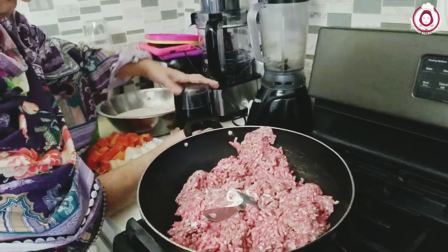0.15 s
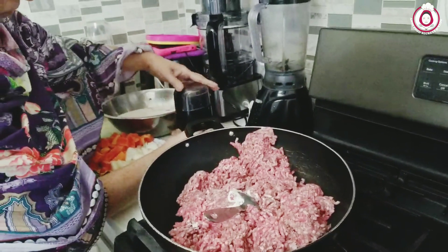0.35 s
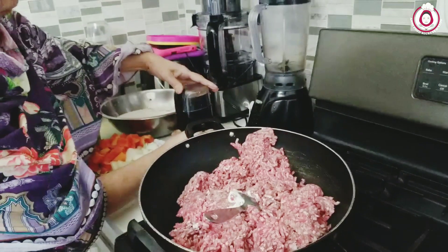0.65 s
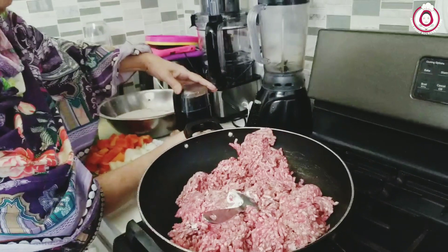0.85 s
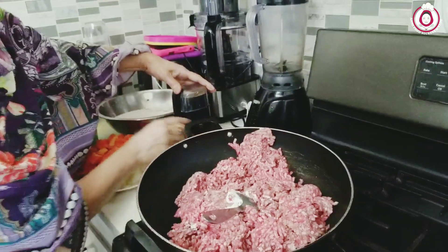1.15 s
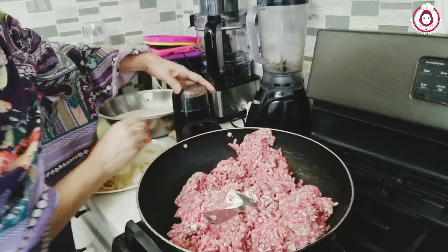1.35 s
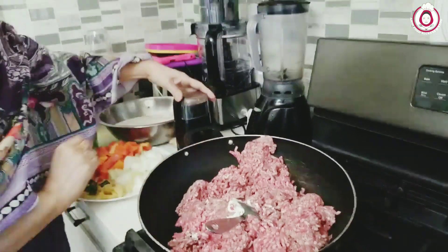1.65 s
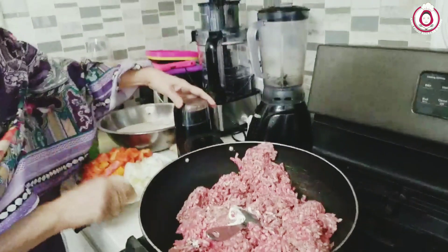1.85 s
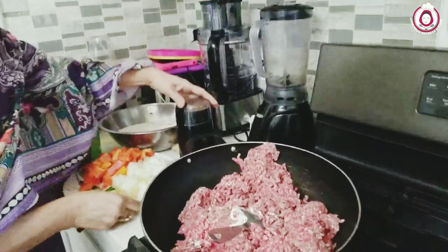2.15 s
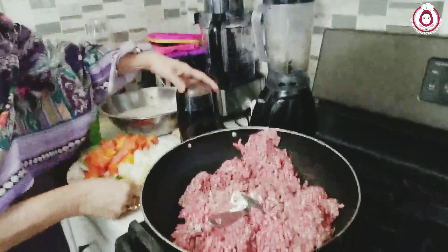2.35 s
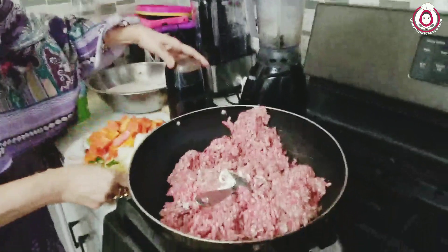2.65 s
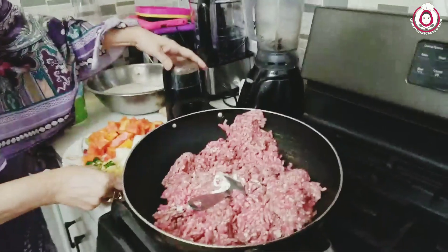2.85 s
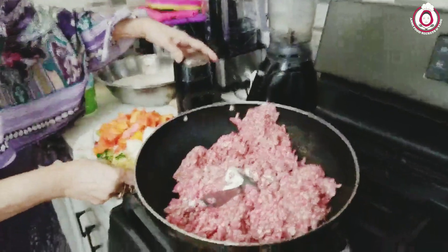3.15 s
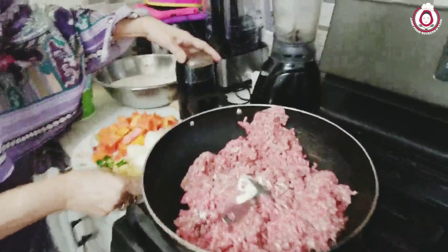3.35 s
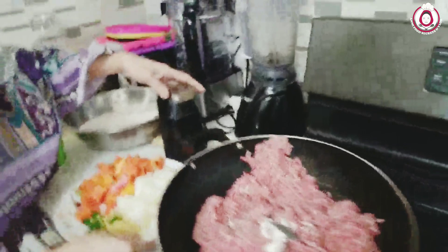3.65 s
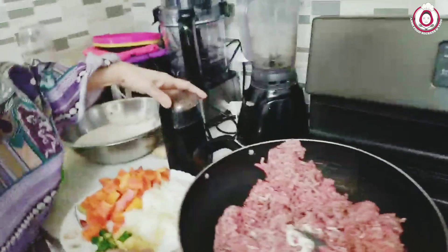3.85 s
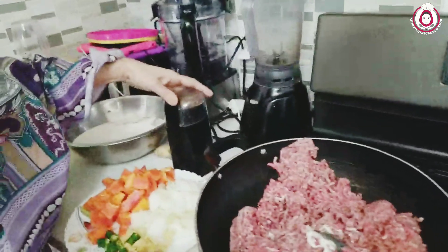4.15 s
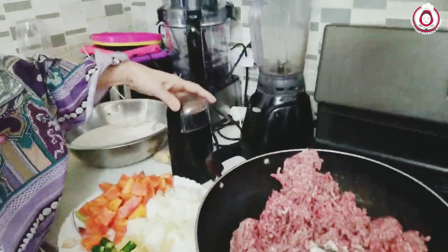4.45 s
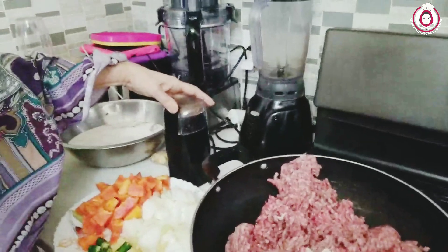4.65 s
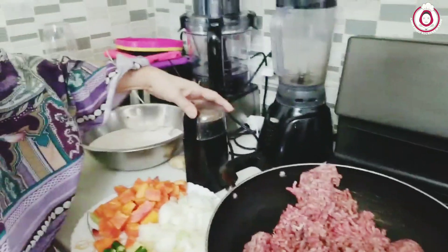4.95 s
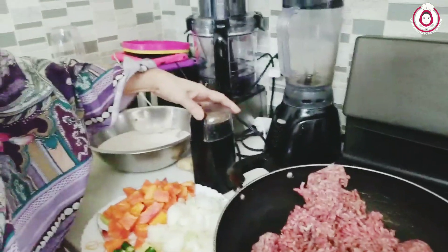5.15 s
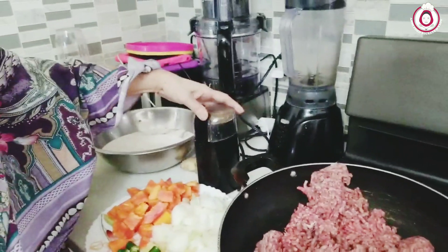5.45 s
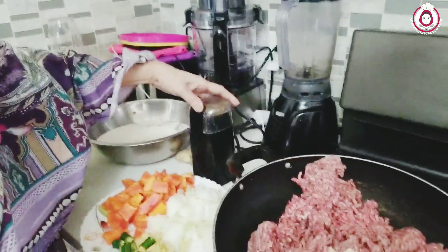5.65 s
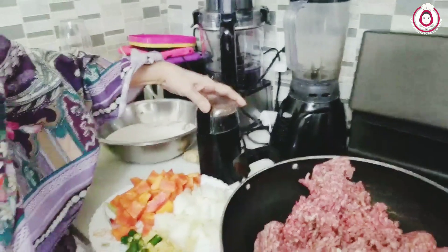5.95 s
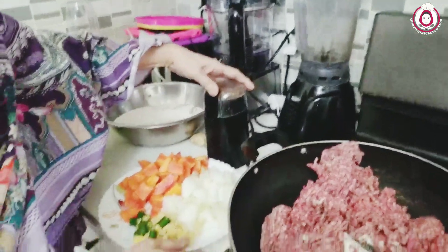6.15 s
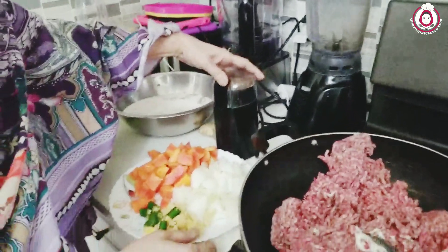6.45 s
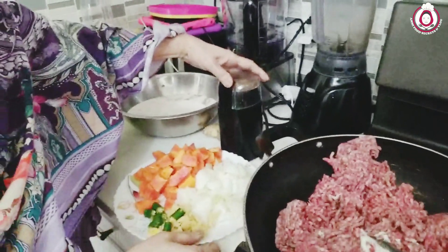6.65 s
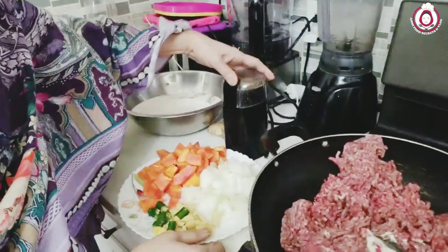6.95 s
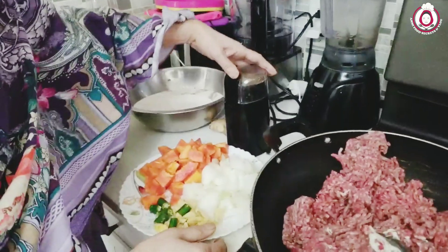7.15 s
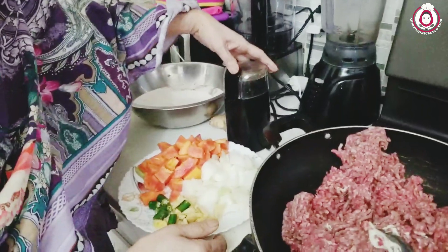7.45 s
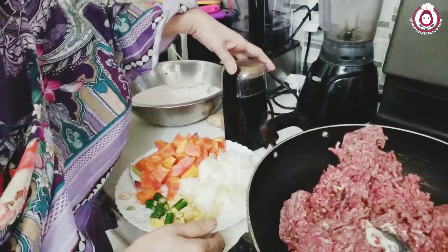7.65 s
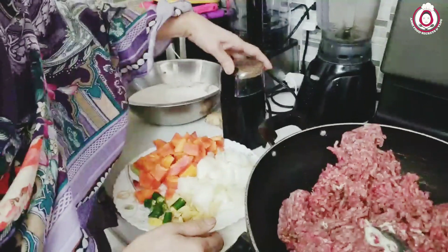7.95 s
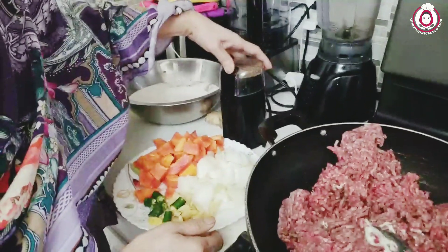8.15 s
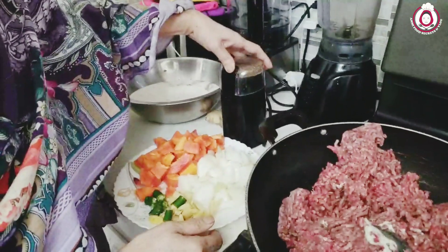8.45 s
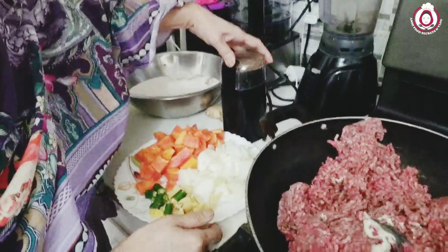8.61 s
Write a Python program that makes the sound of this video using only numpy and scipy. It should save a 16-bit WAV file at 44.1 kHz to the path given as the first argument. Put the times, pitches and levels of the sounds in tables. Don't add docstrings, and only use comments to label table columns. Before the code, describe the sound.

In a tiled kitchen, a faint burner hiss and small finger clicks on a plastic lid come first. A small spice grinder then jolts on, humming and whining while hard seeds crack against the blade and powder hisses round the cup. The pitch creeps up as the grind gets finer. Near the end it is released, runs down, and is pressed again. Close phone microphone, thin bass, short tile echo.

```python
import sys
import numpy as np
from scipy import signal
from scipy.fft import rfft, irfft, next_fast_len
from scipy.io import wavfile
from scipy.ndimage import uniform_filter1d, map_coordinates

SR = 44100
rng = np.random.default_rng(int(sys.argv[2]) if len(sys.argv) > 2 else 0)


def dump(signal):
    limited = np.clip(np.atleast_2d(signal).T, -1, 1)
    pcm = np.round(limited * 32767).astype(np.int16)
    wavfile.write(sys.argv[1], SR, pcm)


def how_loud(loudness_db):
    steps = np.asarray(loudness_db, float) / 20
    return 10 ** steps


N = 387198
TIME = np.arange(N) / SR

# [on t/s, off t/s, boost of the whine level/dB]
PRESSES = [
    (.442, 7.138, 1),
    (7.7, 9, 12.5),
]
# [t/s, peak level/dB, knock level/dB, top octave level/dB]
CRACKS = [(0.6447, -2.5, -24, -10), (0.706, 2, -18, -14), (0.8, -3, -12, -27), (0.887, -0.5, -18, -11.5),
          (0.9308, -7.5, -13, -6), (0.9765, -4.5, -15, -18), (1.0486, -4, -21, -6), (1.2384, -9.5, -15, -3),
          (1.395, -6.5, -14, -9), (1.4858, -9, -27, -4), (1.5532, -5, -21, -10), (1.656, -9, -18, -5),
          (1.7517, -2, -19, -17), (1.901, -6.5, -22, -9), (2.199, -7.5, -26, -9), (2.4621, -5, -18, -5),
          (2.515, -3.5, -14, -12.5), (2.6936, -6, -17, -9), (3.1356, -5.5, -12, -12),
          (3.2204, -3, -15, -12.5), (3.3809, -12, -18, -1), (3.4828, -2.5, -14, -8.5),
          (3.5047, -3, -14, -30), (3.5855, -5.5, -16, -10), (3.757, -8.5, -15, -20), (3.955, -8, -6, -7),
          (4.1246, -3, -21, -8.5), (4.139, -7, -27, -9.5), (4.2386, -4.5, -17, -10),
          (4.3962, -5.5, -19, -9.5)]
# [t/s, peak level/dB, knock level/dB, top octave level/dB]
LATE_CRACKS = [(4.3567, -12.5, -11, -3.5), (4.6471, -3.5, -22, -11.5), (4.801, -6, -15, -12),
               (4.985, -8.5, -13, -7), (5.0064, -7.5, -16.5, -8.5), (5.262, -1.5, -30, -12),
               (5.4423, -5, -32, -17), (5.4864, -5.5, -17, -8.5), (5.6509, -5.5, -23, -10),
               (5.6827, -7, -13, -9), (5.8703, -2, -26, -9), (5.9439, -5, -23, -7), (6.055, -4, -8, -13),
               (6.1094, -4.5, -17.5, -14), (6.1745, -3.5, -19, -10), (6.3174, -7, -29, -12),
               (6.4212, -13.5, -18, -3), (6.4825, -8, -6, -11), (6.6135, -7, -17, -19),
               (6.889, -10, -8, -13), (7.0587, -9, -17, -25), (7.2336, -2.5, -26.5, -15),
               (7.3254, -15, -16, -24), (7.3682, -7, -21, -10.5), (7.735, -8.5, -21, -27),
               (7.8299, -10.5, -15, -11), (7.9752, -7, -24, -6.5), (8.1084, -7, -5, -24),
               (8.2065, -8, -29, -9), (8.237, -1, -10, -15)]


def unit(x):
    return x / np.sqrt(np.mean(x ** 2) + 1e-20)


def along(points, hz):
    f, v = np.transpose(points)
    return np.interp(np.log(hz + 1), np.log(f + 1), v)


def curves(*tables):
    s, *cols = np.transpose(np.vstack(tables))
    return [np.interp(TIME, s, c) for c in cols]


def powered():
    return uniform_filter1d(sum((TIME >= on) * (TIME <= off) for on, off, _ in PRESSES) * 1., size=220)


def wobble(rate):
    return map_coordinates(rng.standard_normal(int(N * rate / SR) + 4), [np.arange(N) * rate / SR])


def filtered(x, response):
    m = next_fast_len(N + SR // 2)
    return irfft(rfft(x, m) * response(np.fft.rfftfreq(m, 1 / SR)), m)[..., :N]


def modes(table):
    def response(f):
        total = 0
        for k, (c, w, db) in enumerate(table):
            total = total + (-1) ** k * how_loud(db) * 1j * f * w / (c * c - f * f + 1j * f * w)
        return total
    return response


def rush(spectrum, patchy_db):
    z = signal.stft(rng.standard_normal(N), nperseg=512)[2]
    field = uniform_filter1d(rng.standard_normal(z.shape), size=8, axis=0)
    field = uniform_filter1d(field, size=6, axis=1)
    x = signal.istft(z * how_loud(patchy_db * unit(field)), nperseg=512)[1][:N]
    return unit(filtered(x, lambda hz: how_loud(along(spectrum, hz))))


def bursts(times, levels_db, t60s, rise_s):
    env, t = np.zeros(N + SR), np.arange(SR // 10) / SR
    for s, db, t60 in zip(times, levels_db, t60s):
        fall = how_loud(db - 60 * t / np.clip(t60, .004, .3))
        env[round(s * SR):][:len(t)] += fall * (1 - np.exp(-t / rise_s))
    return env[:N]


def narrow(hz, width_hz):
    turn = 2 * np.pi * np.cumsum(hz) / SR
    slow = filtered(rng.standard_normal((2, N)), lambda f: 1 / (1 + 1.3j * f / width_hz) ** 2)
    return unit(slow[0] * np.cos(turn) + slow[1] * np.sin(turn))


def kitchen():
    # [f/Hz, level/dB per Hz]
    quiet = [(30, -7), (74, -0.5), (217, -8), (373, -4), (656, -15.5), (900, -29), (1930, -38), (5000, -35),
             (9000, -44), (14000, -51)]
    # [f/Hz, level/dB per Hz]
    simmer = [(2300, -43), (2750, -1), (3400, -5), (4000, 1.5), (4500, -14.5), (6200, -41), (6900, -17),
              (7600, -31), (14000, -28)]
    # [t/s, level/dB]
    flame = [(0, -54.5), (.33, -53.5), (.44, -53), (7.5, -63), (8.78, -66)]
    # [t/s, level/dB, time to fall 60 dB/s, f/Hz, width/Hz]
    tap_table = [
        (.126, -57, 0.2, 930, 180),
        (.287, -41, .04, 3500, 390),
        (.287, -59, 0.05, 2600, 3400),
        (.287, -52, 0.39, 1300, 1100),
        (.388, -45, .3, 3370, 20),
        (.41, -52, 0.42, 1400, 1495),
        (0.444, -27.5, 0.25, 385, 130),
        (0.446, -25, 0.61, 917, 54),
        (7.7, -35, 0.36, 420, 250),
    ]
    taps, t = np.zeros(N + SR), np.arange(SR // 5) / SR
    for s, db, t60, hz, width_hz in tap_table:
        band = np.array([hz - width_hz / 2, hz + width_hz / 2]) / (SR / 2)
        shake = signal.lfilter(*signal.butter(1, band, "band"), rng.standard_normal(len(t)))
        taps[round(s * SR):][:len(t)] += how_loud(db - 60 * t / t60) * (1 - np.exp(-t / .001)) * unit(shake)
    hiss = how_loud(curves(flame)[0]) * rush(simmer, patchy_db=1.5)
    return how_loud(-52) * rush(quiet, patchy_db=-3.0) + hiss + taps[:N]


def shaft():
    # [t/s, shaft f/Hz, hand pressure level/dB]
    free = [
        [(.44, 268.3, -0.5), (1.7, 266.2, -4.5), (2.4, 275, -5), (3.05, 283.5, -3), (3.75, 287.1, -3),
         (3.95, 290, -1.5), (5.5, 296.2, 3.5), (6.3, 295.6, 0), (7.1, 299.3, -1)],
        [(7.7, 290, -2.5), (7.97, 272.2, -0.5), (8.05, 289, -5), (8.2, 290.8, 4), (8.45, 299.2, 2.5),
         (8.78, 301.4, -0.5)],
    ]
    spin_up_s, braking_hz_per_s, struck_sag_hz = .068, 900, 3.5
    free_hz, hand_db = curves(*free)
    speed = np.zeros(N)
    for (on, off, _), rows in zip(PRESSES, free):
        driven = free_hz * (1 - np.exp(-np.clip(TIME - on, 0, None) / spin_up_s))
        run_down = np.clip(rows[-1][1] - braking_hz_per_s * (TIME - off), 0, None)
        speed += np.where(TIME < off, driven, run_down)
    s, db, *_ = np.transpose(CRACKS + LATE_CRACKS)
    sag = struck_sag_hz * bursts(s, db, np.full(len(s), .25), rise_s=.02)
    return np.abs(speed - sag), hand_db


def load():
    # [t/s, level/dB]
    flying = [
        [(.477, -18), (.525, -22), (.86, -19.5), (1.15, -22), (2.24, -25.5), (3.39, -24), (3.9, -25.5),
         (5.74, -25), (7.2, -27.5)],
        [(7.717, -35), (7.87, -22.5), (8.264, -25), (8.78, -26.5)],
    ]
    attack_s, settle_s, fall_db_per_s, residue_db = 0.017, 0.3, 260, -40
    knee_s = 0.044
    gate = 0
    for on, off, _ in PRESSES:
        fall_s = knee_s * np.logaddexp(0, (TIME - off - settle_s) / knee_s)
        settling = how_loud(np.maximum(-fall_db_per_s * fall_s, residue_db))
        gate = gate + np.clip((TIME - on) / attack_s, 0, 1) ** 3 * settling
    again_s = PRESSES[1][0]
    held_db = np.where(TIME < again_s, *[np.interp(TIME, *np.transpose(rows)) for rows in flying])
    return np.minimum(gate, 1), held_db


def motor(turn, speed, hand_db, gate):
    # [f/Hz, level/dB]
    counter = [(90, -71), (140, -45), (220, -41), (250, -31), (265, -24.5), (275, -26), (289, -26),
               (297, -23.5)]
    # [f/Hz, level/dB]
    third = [(600, -74), (790, -53), (830, -45), (850, -37), (872, -48), (900, -44)]
    # [f/Hz, level/dB]
    sing = [(2000, -68), (2530, -54), (2600, -38.5), (2710, -35), (2790, -43.5), (2920, -58), (2990, -40)]
    null_hz, null_width_hz = 284.5, 7
    bare_s = 0.35

    def tone(order, rough):
        return np.sqrt(2) * np.sin(order * turn + rough * wobble(60))

    current = powered()
    felt = how_loud(along(counter, speed) + hand_db) * np.tanh((speed - null_hz) / null_width_hz)
    hum = felt * how_loud(0.25 * wobble(25)) * (tone(order=1, rough=0.034) + how_loud(-32) * tone(order=2, rough=0.77))
    hum += current * how_loud(-47.5) * narrow(speed, width_hz=27.0)

    whine = how_loud(along(sing, 10 * speed) + 2.05 * wobble(30)) * tone(order=10, rough=0.62)
    whistle_db = -45.5 + 8 * (TIME > PRESSES[1][0]) - 5 * ((20 * speed - 5930) / 90) ** 2
    whine += how_loud(whistle_db) * tone(order=20, rough=.5)
    side_db = along(sing, np.abs(10 * speed - 120)) - 1.5 + 2.5 * wobble(20)
    side_phase = 10 * turn - 2 * np.pi * 120 * TIME + 1.1 * wobble(50)
    whine += how_loud(side_db) * np.sqrt(2) * np.sin(side_phase)
    boost_db = sum(db * (TIME > on) * np.exp(-((TIME - on) / bare_s) ** 2) for on, _, db in PRESSES)

    casing = how_loud(along(third, 3 * speed) + 2.5 * wobble(30)) * tone(order=3, rough=.15)
    buzz = how_loud(-49.5) * narrow(np.full(N, 119.), width_hz=9.5)
    return hum + current * (casing + how_loud(boost_db) * whine) + gate * buzz


def powder(turn, gate, hiss_db):
    # [f/Hz, level/dB per Hz]
    powder_colour = [(1000, -42), (1700, -13), (1980, -7.5), (2340, 0.5), (3750, -1.5), (4940, -0.5),
                     (5440, -0.5), (5740, -0.5), (7970, -1.5), (9030, -6), (12800, 2.5), (13500, 1.5),
                     (14200, -9)]
    # [f/Hz, level/dB per Hz]
    rattle_colour = [(40, -49), (90, -80), (160, -29), (330, -6), (620, -23), (740, 1), (1100, -5.5),
                     (1500, 1), (1900, -3.5), (2600, -16.5)]
    # [f/Hz, width/Hz, level/dB]
    rim_modes = [(2616, 120, 4.5), (4720, 100, 5), (5030, 160, 5), (8100, 250, 2.5)]
    # [t/s, f/Hz, level/dB]
    grip = [(.44, 1296, -22), (.76, 1371, -7), (1.6, 1327, -5), (2.13, 1467, -4.5), (4.41, 1386, -1.5),
            (6.95, 1401, -4), (7.38, 1122, -1.5), (7.95, 1406, -3), (8.78, 1450, -1.5)]
    high_hz, high_db = curves(grip)
    s, size = rng.random((2, 500))
    grit = 1 + bursts(s * N / SR, -14 + 11 * size, np.full(len(s), .03), rise_s=0.00036)
    sweep = 1 + 0.039 * np.cos(2 * turn)
    surge = unit(wobble(22) + 1.34 * wobble(9))
    caking_db = -0.92 * TIME
    rim = how_loud(caking_db) * filtered(rng.standard_normal(N), modes(rim_modes))
    swept = unit(grit * sweep * (rush(powder_colour, patchy_db=1.5) + rim))
    hiss = how_loud(hiss_db - 0.3 + 1.05 * surge) * swept

    low_hz = 791.4 - 6 * TIME
    ring = how_loud(-5.5) * narrow(low_hz, width_hz=55) + how_loud(high_db) * narrow(high_hz, width_hz=65)
    ring += how_loud(-4 + caking_db) * narrow(np.full(N, 1020.), width_hz=110)
    rocking_db = 13 * (1 - powered())
    thud = how_loud(-13 + caking_db + rocking_db) * narrow(np.full(N, 420.), width_hz=250)
    rattle = unit(grit ** 1.45 * (rush(rattle_colour, patchy_db=2.5) + ring + thud))
    shaking = how_loud(.8 * surge + .9 * wobble(30))
    rattle_db = -32 + 0.5 * (hiss_db - np.median(hiss_db))
    return gate * (hiss + how_loud(rattle_db) * shaking * rattle)


def seeds(gate):
    # [f/Hz, width/Hz, level/dB]
    cup_modes = [(2500, 790, 3), (4520, 810, 3.5), (5970, 2000, -2), (7170, 900, 3.5), (12550, 1850, 6)]
    when, size, thump = rng.random((65, 3)).T
    chip_s = when * (N - 1) / SR
    chip_db = -12 + 5 * (2 * size - 1)
    chip_knock_db = -17.5 + 6 * (2 * thump - 1)
    chip_top_db = -8.5 + 0.23 * when * N / SR
    chips = np.transpose([chip_s, chip_db, chip_knock_db, chip_top_db])
    chips = chips[gate[(chips[:, 0] * SR).astype(int)] > .5]
    whole_s = np.array(CRACKS + LATE_CRACKS)[:, 0]
    chips = chips[np.abs(chips[:, :1] - whole_s).min(axis=1) > .025]
    s, db, knock_db, top_db = np.transpose(np.vstack([CRACKS, LATE_CRACKS, chips]))

    def snap(level_db):
        sharp_db = level_db - 13 + 1.24 * np.minimum(s, 6)
        split = bursts(s, sharp_db, np.full(len(s), .012), rise_s=0.00015)
        scatter = bursts(s, level_db - 5.0, np.full(len(s), .07), rise_s=0.0056)
        return split + scatter

    def casing(f):
        feet = 1 - 1j * (620 / (f + 1)) ** 3
        return modes([(790, 150, 0), (1420, 200, -1)])(f) / feet

    knock = bursts(s, np.minimum(db + knock_db, -20) + 17.5, np.full(len(s), .06), rise_s=0.0012)
    noise = rng.standard_normal((3, N))
    body = filtered(snap(db) * noise[0], modes(cup_modes[:3]))
    top = filtered(snap(db + top_db + 7) * noise[1], modes(cup_modes[3:]))
    return body + top + filtered(knock * noise[2], casing)


def duller(x):
    # [t/s, level/dB]
    fineness_db = [(.44, 0), (2, 1), (5, 0.5), (6.5, -2), (7.3, -4), (8, -6), (8.78, -1)]
    high_pass = signal.butter(2, 8500 / (SR / 2), "high")
    top = signal.lfilter(*high_pass, x[::-1])[::-1]
    top = signal.lfilter(*high_pass, top)
    return x + (how_loud(curves(fineness_db)[0]) - 1) * top


def walls(x):
    # [f/Hz, time to fall 60 dB/s]
    wall_t60 = [(200, 0.36), (2000, 0.1), (12000, 0.074)]
    hz, t, z = signal.stft(rng.standard_normal(SR // 2), SR, nperseg=256)
    tail = signal.istft(z * how_loud(-60 * t / along(wall_t60, hz)[:, None]), SR, nperseg=256)[1]
    return signal.fftconvolve(np.pad(x, (300, 0)), tail / np.linalg.norm(tail))[:N]


def scene():
    speed, hand_db = shaft()
    gate, hiss_db = load()
    speed = speed * (1 + 0.00256 * wobble(15))
    turn = 2 * np.pi * np.cumsum(speed) / SR
    cup = duller(powder(turn, gate, hiss_db) + seeds(gate))
    mono = kitchen() + motor(turn, speed, hand_db, gate) + cup + how_loud(-10.5) * walls(cup)
    return np.array([mono, mono])


def low_pass(x):
    return signal.sosfilt(signal.butter(12, 15270, fs=SR, output="sos"), x)


def record(dry):
    # [f/Hz, level/dB]
    mic = [(20, -8), (60, -10), (110, -1.5), (13900, 1), (14150, -31.5), (14700, -65)]
    mix = filtered(dry, lambda hz: how_loud(along(mic, hz)))
    return low_pass(mix)


dry = scene()
out = record(dry)
dump(out)
```